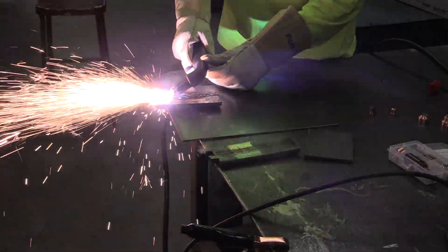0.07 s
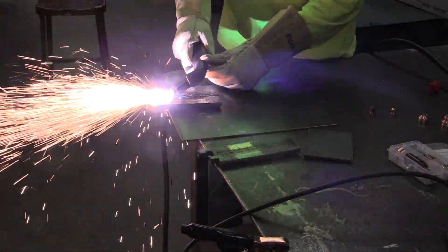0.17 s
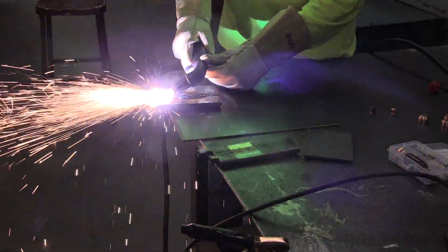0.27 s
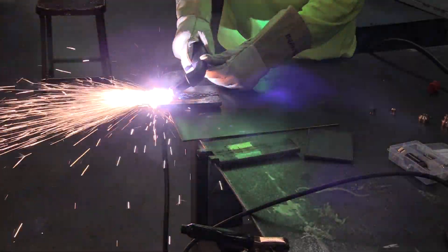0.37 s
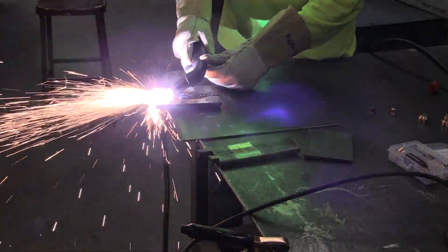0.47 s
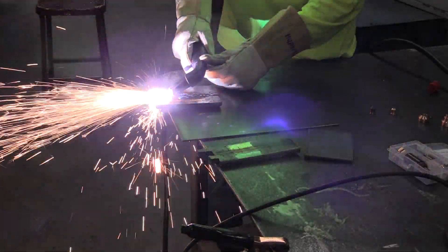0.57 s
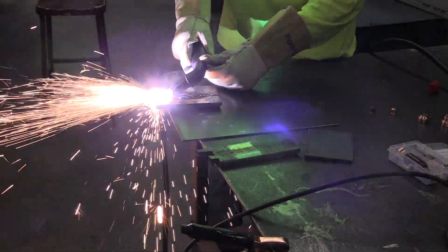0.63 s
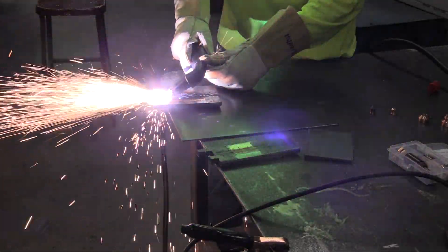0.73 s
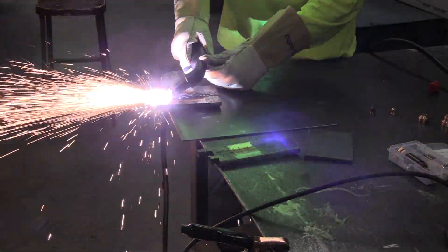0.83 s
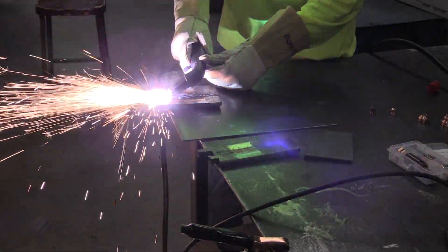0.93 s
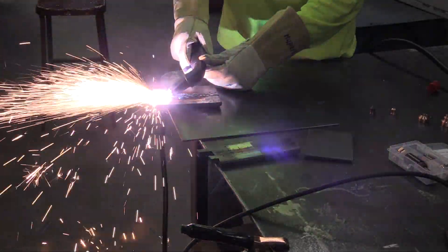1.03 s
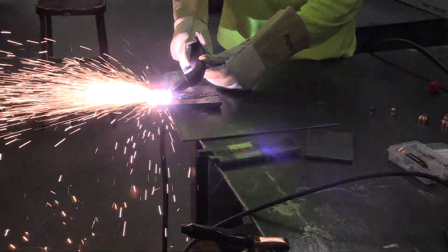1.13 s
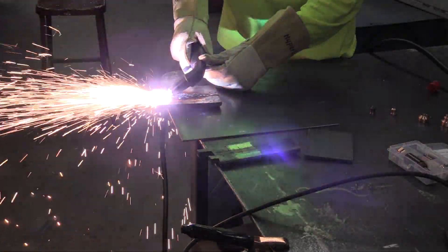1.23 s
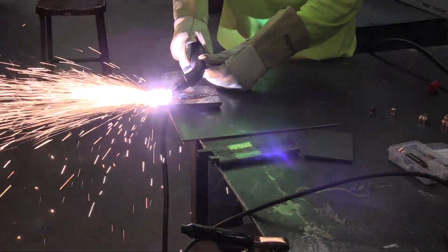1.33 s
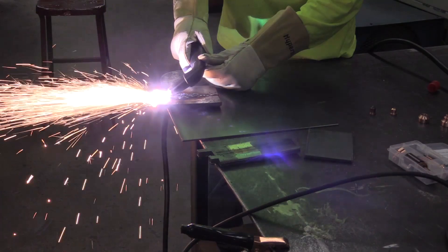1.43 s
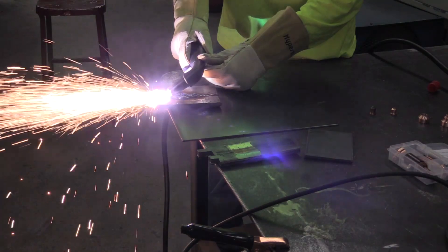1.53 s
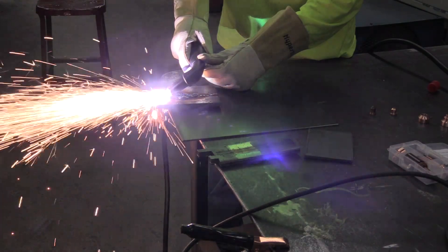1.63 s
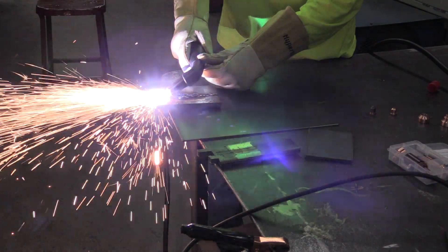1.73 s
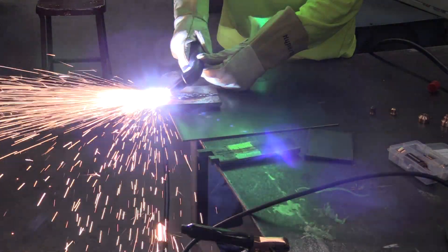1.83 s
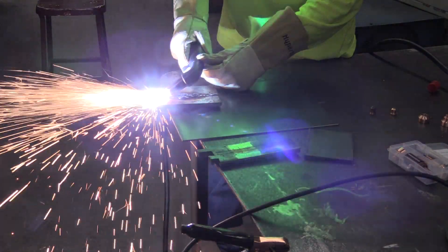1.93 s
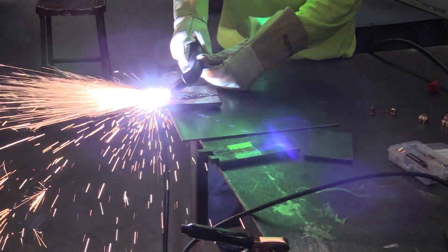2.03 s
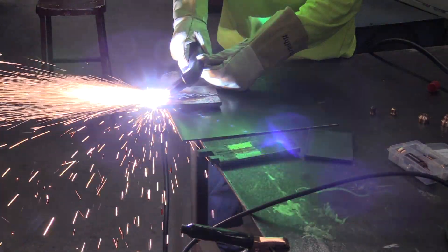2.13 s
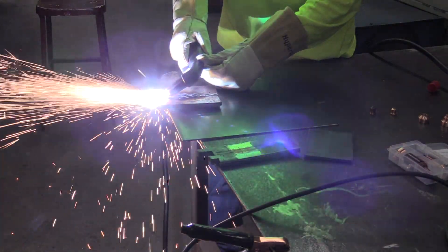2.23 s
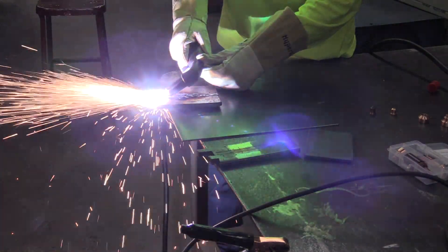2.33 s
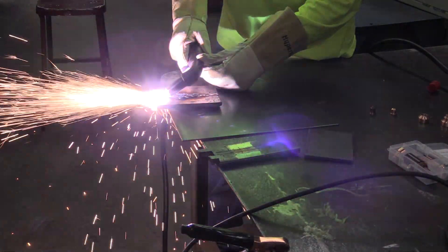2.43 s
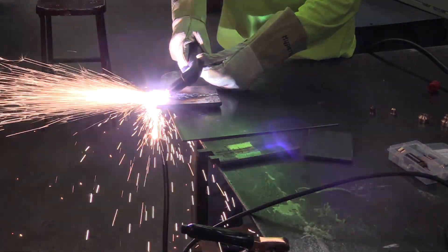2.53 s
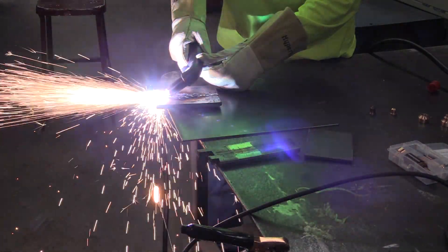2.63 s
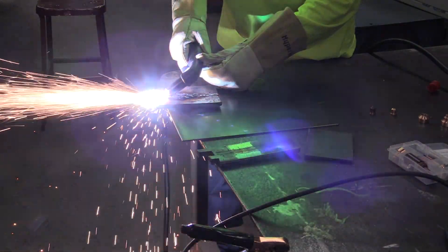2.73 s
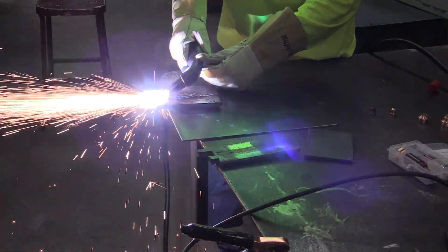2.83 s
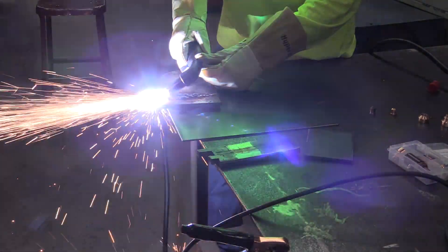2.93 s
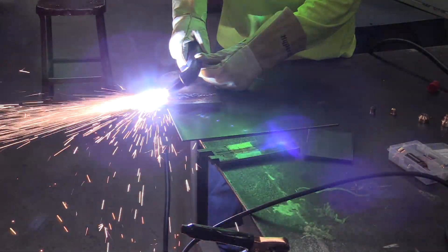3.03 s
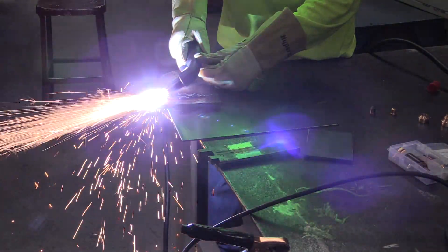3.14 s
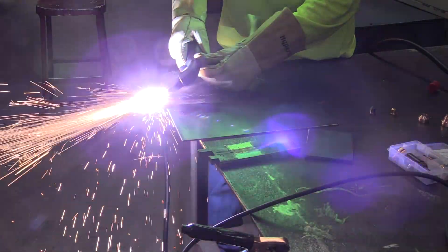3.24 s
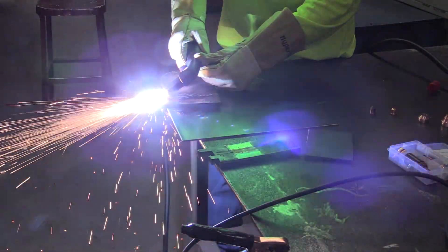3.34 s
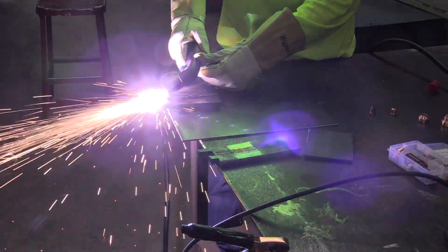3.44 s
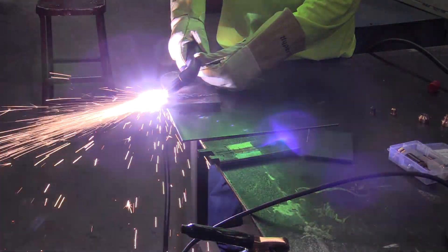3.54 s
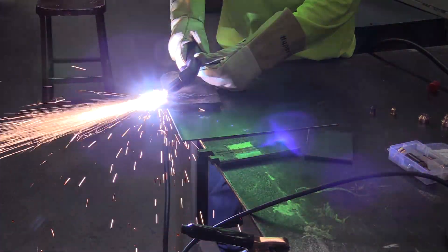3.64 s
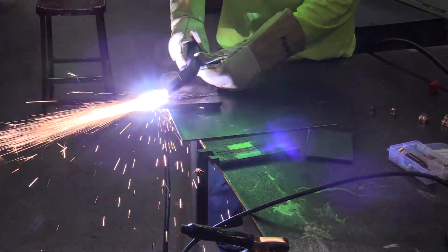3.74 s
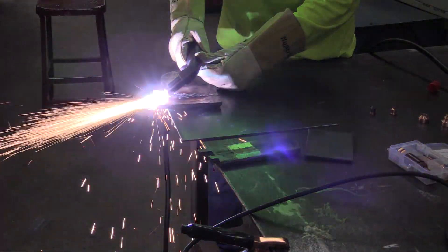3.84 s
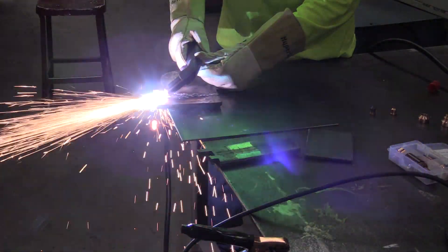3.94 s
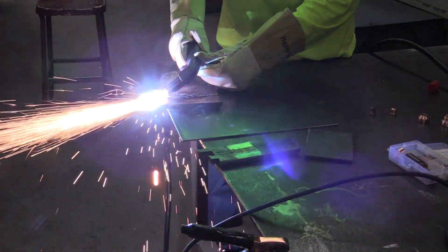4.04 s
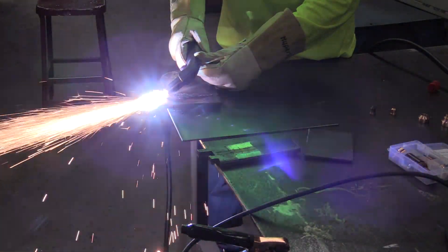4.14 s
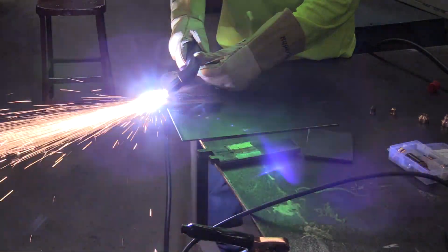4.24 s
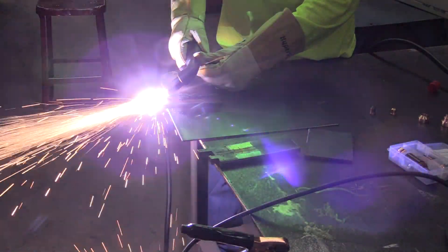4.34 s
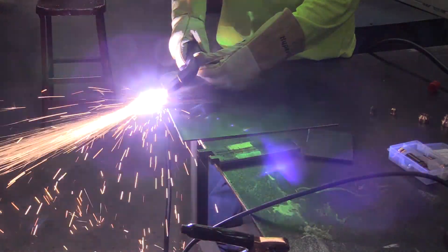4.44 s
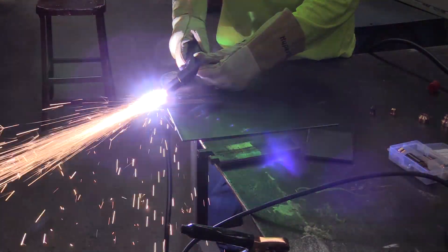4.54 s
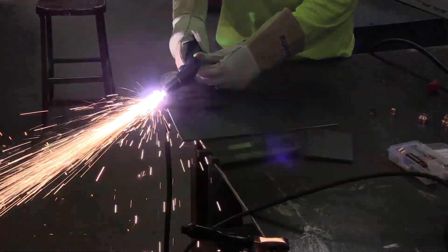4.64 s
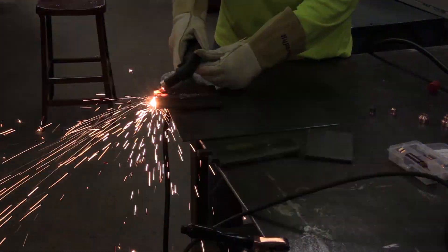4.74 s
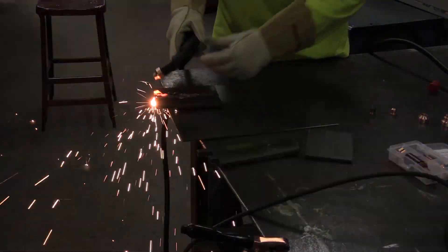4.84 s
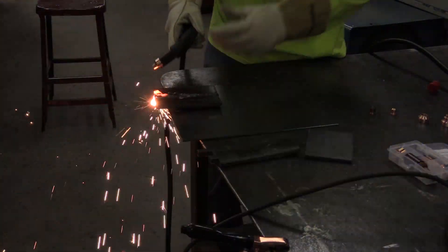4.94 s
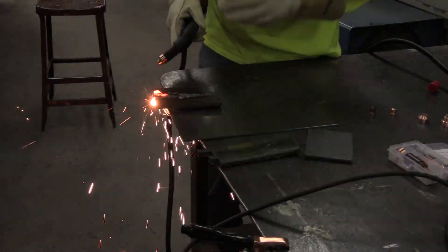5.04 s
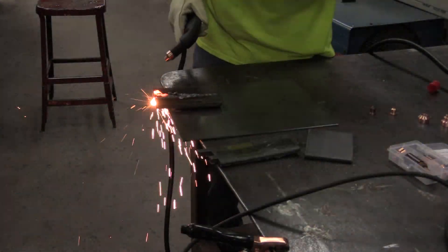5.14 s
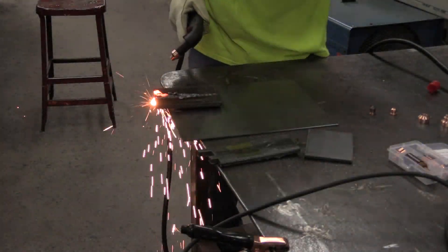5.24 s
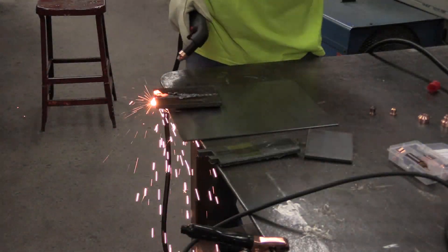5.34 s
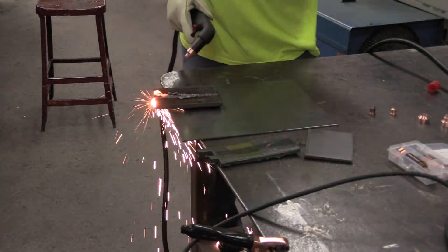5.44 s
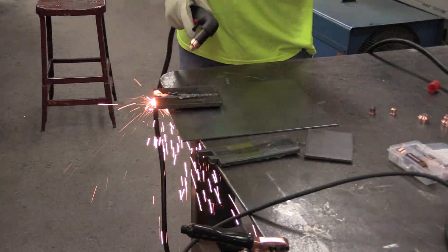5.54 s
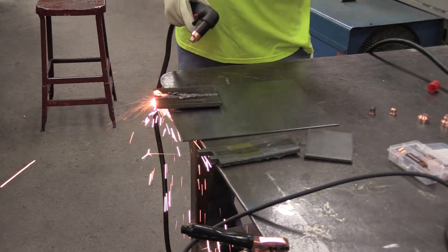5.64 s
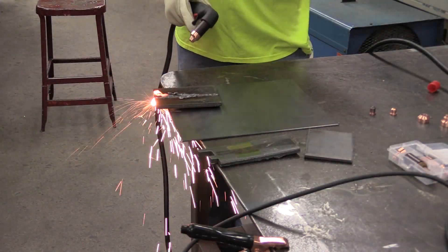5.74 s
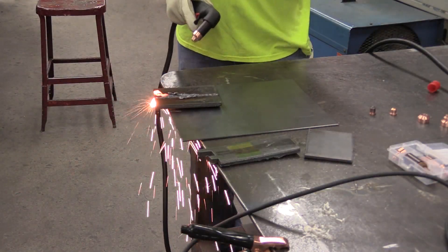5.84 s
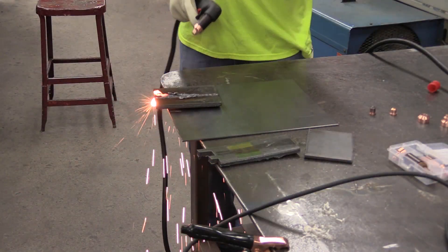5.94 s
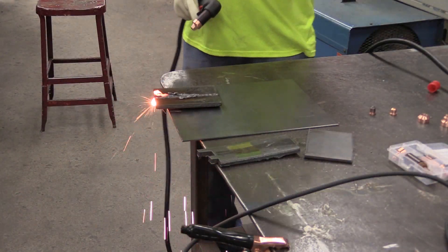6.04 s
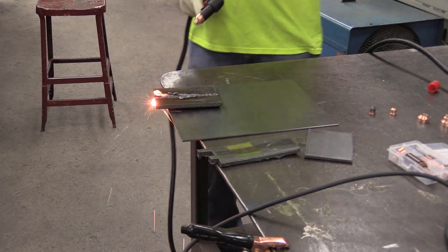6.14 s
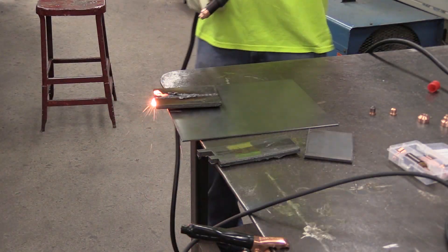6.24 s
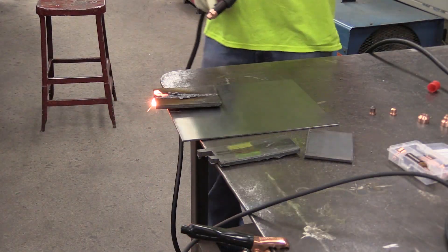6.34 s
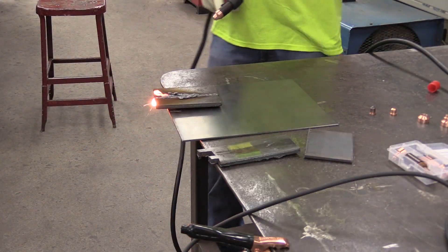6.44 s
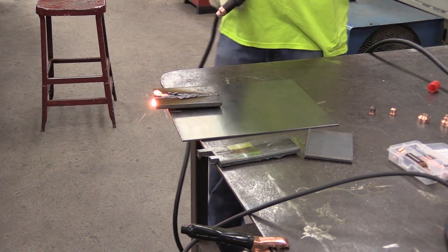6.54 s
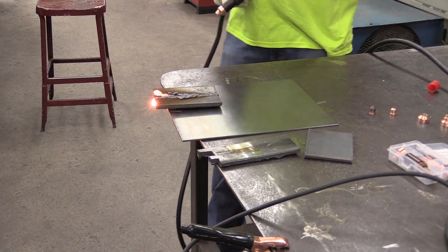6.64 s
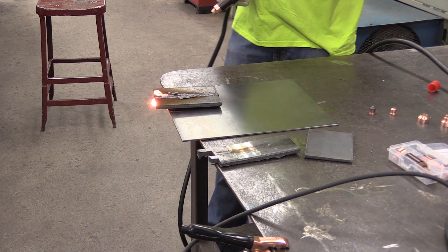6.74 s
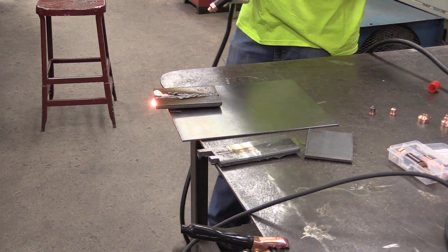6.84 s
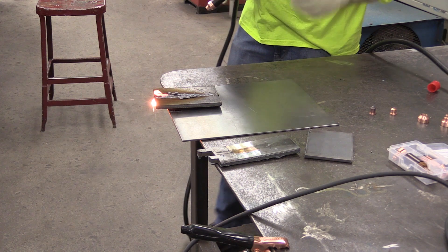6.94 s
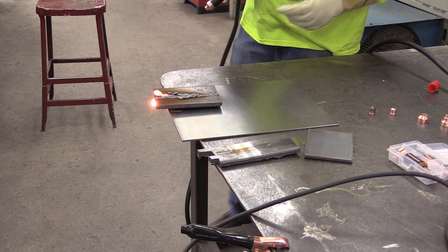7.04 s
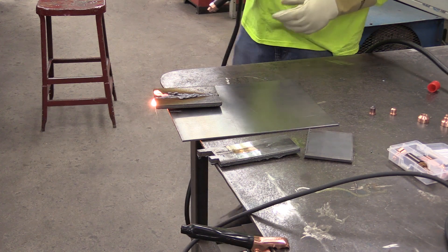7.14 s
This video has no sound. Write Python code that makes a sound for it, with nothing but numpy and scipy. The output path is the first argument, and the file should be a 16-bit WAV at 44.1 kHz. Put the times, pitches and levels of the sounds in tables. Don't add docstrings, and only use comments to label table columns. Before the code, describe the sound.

From 0 to about 4.75 s a plasma torch gouges steel with a loud, continuous roar: broadband jet noise strongest in the upper mids, little deep bass, fluttering slightly and surging gently by a decibel or two. Close echoes off metal, bench and floor give it a hollow, combed colour, with a thin high singing edge fading by 3 s. At 4.75 s it cuts off with a sharp dry pop and a short room tail. A far quieter, airy cooling hiss continues, dips near 5.2 s, then rises to a steady level by 5.7 s, its treble sweeping subtly as the nozzle turns. Low workshop rumble and hum emerge beneath, with a soft low bump near 5.6 s. At 5.95 s one dull, damped bench knock sounds with tiny bounces. A faint motor whine climbs slightly from about 6 s to the end at 7.2 s. Mono-like microphone, a few metres away.

```python
import sys
import numpy as np
from scipy import signal
from scipy.fft import rfft, irfft
from scipy.io import wavfile
from scipy.ndimage import uniform_filter1d, map_coordinates

SR = 44100
rng = np.random.default_rng(int(sys.argv[2]) if len(sys.argv) > 2 else 0)


def voltage_ratio(level):
    return 10 ** (np.asarray(level, float) / 20)


def waveform_to_disk(signal):
    frames = np.transpose(np.atleast_2d(signal))
    scaled = np.clip(frames, -1, 1) * 32767
    samples = np.round(scaled).astype(np.int16)
    wavfile.write(sys.argv[1], SR, samples)


N = 317079
T = np.arange(N) / SR
STEP = 32
SIZE = 45 * 2 ** 13
HZ = np.arange(SIZE // 2 + 1) * SR / SIZE + 1e-3
ARC_OFF_S = 4.7493

# f/Hz, level/dB per Hz
SHOP_COLOUR = [(15, -51), (25, -11), (69, -8.5), (144, -9.5), (189, -1.5), (438, -13), (524, -8.5),
               (805, -13.5), (896, -13), (1030, -12), (1240, -11), (1450, -11), (1800, -9.5), (2340, -16),
               (3960, -120)]
# f/Hz, width/Hz, level/dB
HUMS = [(78, 6.9, -61), (190, 60, -55)]
# t/s, whine f/Hz
MOTOR_SPEED = [
    (5.8, 1163),
    (6.05, 1175),
    (6.5, 1216),
    (6.7, 1233),
    (6.9, 1246),
    (7.19, 1257),
]
# ratio to the whine [1], level/dB, swell/dB, swell centre t/s, swell length/s
MOTOR_TONES = [(1, -57, 8, 6.55, .32), (.752, -63, 8, 6.3, .35), (.436, -61, 11, 5.95, .6)]
# f/Hz, level/dB, t60/s, build-up/ms
BENCH_MODES = [(570, 11, .018, 5), (420, -1, .022, 4), (950, -6, .016, 2), (1165, 2, .028, 6),
               (1500, 9, .022, 9), (1700, 2, .018, 1.5), (2100, 0, .016, 1.2)]
# delay/ms, level/dB
BOUNCES = [
    (0, 0),
    (9.5, -13),
    (20, -20),
]
# f/Hz, level/dB per Hz
AIR_COLOUR = [(760, -52), (1460, -31), (1850, -13.5), (2500, -5.5), (3220, 1), (3800, -3.5), (4150, -7.5),
              (5150, -7), (6700, -12), (8300, -11.5), (10300, -18.5), (12000, -19.5), (14200, -17),
              (15900, -20)]
# t/s, level/dB, brightness/dB as the nozzle swings
COOLING = [(4.8, -39.5, -2), (4.92, -39, -2.5), (5.08, -38.5, 1), (5.22, -41, 4.5), (5.45, -38.5, 2.5),
           (5.7, -34, 0), (6.2, -34, 0.5), (6.6, -33, 0), (7.19, -33, -.5)]
# t/s, glove echo delay/ms, edge band f/Hz, facing the microphone [0-1]
TORCH_TURN = [
    (4.9, .7, 14000, 0),
    (5.7, .7, 14000, .25),
    (6.12, .64, 14300, .62),
    (6.28, .7, 14000, .68),
    (6.5, .665, 15500, .95),
    (6.62, .65, 13800, .62),
    (6.8, .643, 14000, 1),
    (7.19, .645, 13900, .95),
]
GLOVE_SHARE = (.13, .26)
EDGE_DB = (-30, -11)
# delay/ms, level/dB
POP_PATHS = [
    (0, 1.5),
    (3.97, -3),
    (6.93, -9),
]
# f/Hz, level/dB per Hz
ARC_COLOUR = [(18, -70), (30, -39), (120, -24.5), (260, -18), (380, -19), (480, -12.5), (900, -11.5),
              (1400, -9.5), (1800, -5.5), (2600, -4), (3220, -2), (4400, -6), (8000, -11), (15900, -24)]
# t/s, level/dB, brightness/dB
JET = [(0, -22.5, 0.5), (.12, -21.5, 1), (.35, -22.5, 1), (.56, -23, -2), (.7, -22, -1), (1.0, -23, 1),
       (1.17, -24, 0.5), (1.4, -21.5, 1), (1.62, -24, 0), (1.85, -21, 0), (2.1, -22, -1), (2.5, -22, -.5),
       (3.2, -22, -0.5), (3.36, -23.5, -1), (3.48, -20.5, -1), (3.9, -22, -1), (4.3, -22.5, -1),
       (4.75, -22, 2.5)]
# delay/ms, returned band centre f/Hz, share early along the groove [1], share late [1]
ECHOES = [(0.452, 3000, -0.044, -0.047), (0.624, 20000, 0.23, 0.16), (0.82, 21000, -0.26, -0.0089),
          (0.996, 2600, 0.06, 0.072), (1.24, 14000, -0.25, -0.0036), (1.26, 5100, 0.068, 0.039),
          (1.396, 19000, 0.081, -0.002), (1.772, 1600, 0.14, 0.11), (1.78, 8400, -0.098, -0.035),
          (1.872, 12800, 0.08, 0.15), (2.696, 10000, -0.048, -0.067), (2.824, 14000, 0.034, 0.14),
          (2.836, 1100, -0.071, -0.16), (3.948, 6200, -0.041, -0.094), (3.968, 3000, -0.0066, 0.087),
          (3.988, 860, 0.32, 0.42), (4.016, 5900, 0.33, 0.15), (4.052, 2000, 0.047, -0.1),
          (6.9, 5900, 0.16, 0.19), (6.936, 620, 0.23, 0.26), (7.216, 3700, 0.085, 0.079),
          (9.044, 1300, -0.16, -0.12)]
# t/s, low edge f/kHz, high edge f/kHz
SPLITS = [(.65, 6.85, 8.35), (.857, 5.68, 6.93), (.859, 7.49, 9), (.974, 11.67, 13.82), (1.533, 8.23, 9.65),
          (2.798, 12.32, 14.56), (2.81, 5.17, 6.93), (2.81, 9.6, 11.8), (3.413, 8.23, 10.42),
          (3.689, 5.64, 7.6), (3.924, 5.14, 6.29), (3.924, 6.8, 8.35), (4.412, 5.12, 6.37),
          (4.553, 4.2, 5.25), (4.899, 5.64, 7.67), (5.175, 8.91, 10.42), (5.2, 4.13, 5.25),
          (5.291, 4.13, 5.21), (5.399, 4.22, 6.37), (5.501, 6.24, 7.67), (5.689, 5.12, 6.33),
          (5.689, 8.18, 9.69), (5.802, 4.18, 5.77), (5.805, 6.2, 7.58), (5.92, 6.3, 7.62),
          (6.034, 5.64, 6.89), (6.197, 7.54, 9.69), (6.269, 8.18, 9.69), (6.524, 4.65, 5.77),
          (6.966, 12.36, 14.56)]


def unit(x):
    return x / np.sqrt(np.mean(x ** 2))


def curves(table):
    s, *columns = np.transpose(table)
    return [np.interp(T, s, c) for c in columns]


def walk(rate):
    k = int(SR / rate / STEP) + 1
    held = np.repeat(rng.standard_normal(N // STEP // k + 1), k)
    slewed = uniform_filter1d(uniform_filter1d(held, k), k)
    return 1.3 * slewed[:len(T[::STEP])]


def smooth(control):
    return np.interp(T, T[::STEP], control)


def through(x, response):
    return irfft(rfft(x, SIZE) * response, SIZE)[:N]


def narrow(hz, width_hz):
    spread = signal.lfilter(*signal.butter(2, width_hz / 2, fs=SR), rng.standard_normal(N))
    return unit(spread * np.sin(2 * np.pi * np.cumsum(hz + 0 * T) / SR))


def turbulence(colour, ref_hz, tilt, flicker_db, flutter_db):
    hz, db = np.transpose(colour)
    spec = rfft(rng.standard_normal(SIZE))
    spec = spec * voltage_ratio(np.interp(np.log(HZ), np.log(hz), db, left=-80, right=-80))
    spec = spec / np.std(irfft(spec * (HZ > ref_hz[0]) * (HZ < ref_hz[1]), SIZE))
    spec = spec.astype(np.complex64)
    knots = np.log2([f for f, _ in tilt])
    lean = np.array([(curve - np.mean(curve))[::STEP] for _, curve in tilt])
    pitch = np.log2(HZ).astype(np.float32)
    out, shared = 0, walk(11)
    for octave in np.arange(np.floor(np.log2(hz[0])), np.log2(hz[-1]) + .5, .5):
        band = irfft(spec * np.clip(1 - 2 * abs(pitch - float(octave)), 0, 1), SIZE)[:N]
        weights = np.array([np.interp(octave, knots, row) for row in np.eye(len(knots))])
        shared = .8 * shared + .6 * walk(14)
        level_db = weights @ lean + flutter_db * shared + flicker_db * walk(30)
        out = out + band * smooth(voltage_ratio(level_db))
    return out


def room(x, wet_db, low_t60, high_t60, top_hz):
    t = T[:SR]
    noise = rng.standard_normal((2, SR)) * (t > .008)
    dull = signal.lfilter(*signal.butter(1, top_hz, fs=SR), noise[0]) * 1000. ** (-t / low_t60)
    bright = noise[1] * 1000. ** (-t / high_t60)
    tail = dull / np.linalg.norm(dull) + 0.021 * bright
    thin_walls = 1j * HZ / (350 + 1j * HZ)
    return x + voltage_ratio(wet_db) * through(x, rfft(tail, SIZE) * thin_walls)


def recovery():
    start_s, length_s, range_db = 5.1, 0.32, 2
    return range_db * (np.clip((T - start_s) / length_s, 0, 1) - 1)


def shop():
    tilt = [(250, -.6 * recovery()), (800, -.3 * recovery())]
    rumble = turbulence(SHOP_COLOUR, (60, 400), tilt, 1.5, 0.36)
    rumble = rumble * voltage_ratio(-48 + recovery()) * np.clip((T - 4.7) / 0.11, 0, 1)
    drone = sum(voltage_ratio(level_db) * narrow(hz, width) for hz, width, level_db in HUMS)
    drone = drone * np.clip((T - 5.) / 1.0, 0, 1)
    bump_s, bump_length_s = 5.57, .11
    bump = voltage_ratio(-43) * narrow(310, 420) * np.exp(-((T - bump_s) / bump_length_s) ** 2)
    return rumble + drone + bump


def motor():
    hz, = curves(MOTOR_SPEED)
    phase = 2 * np.pi * np.cumsum(hz * smooth(1 + .0006 * walk(12))) / SR
    tones = 0
    for ratio, db, swell_db, swell_s, length_s in MOTOR_TONES:
        swell = swell_db * np.exp(-((T - swell_s) / length_s) ** 2 / 2)
        waver_db = 1.2 * smooth(walk(10))
        tones = tones + voltage_ratio(db + swell + waver_db) * np.sin(ratio * phase)
    return tones * voltage_ratio(.8 + .5 * recovery()) * np.clip((T - 4.9) / .2, 0, 1)


def knock():
    knock_s, knock_db = 5.9522, -15
    out = 0
    for delay_ms, bounce_db in BOUNCES:
        t = np.clip(T - knock_s - delay_ms / 1000, 0, 1)
        for hz, db, t60, build_ms in BENCH_MODES:
            ring = np.sin(2 * np.pi * hz * t) * 1000. ** (-t / t60)
            build = 1 - np.exp(-(t * 1000 / build_ms) ** 2)
            out = out + voltage_ratio(knock_db + bounce_db) * voltage_ratio(db) * ring * build
    return out


def air():
    db, bright = curves(COOLING)
    top_rise_db, top_rise_s = 7, 0.76
    top = 1.1 * bright + top_rise_db * (1 - np.exp(-np.maximum(T - ARC_OFF_S, 0) / top_rise_s))
    hiss = turbulence(AIR_COLOUR, (2200, 4500), [(3200, 0 * db), (7000, bright), (13000, top)], 0.82, 0.27)
    ms, edge_hz, facing = curves(TORCH_TURN)
    treble = through(hiss, 1 / (1 + (6500 / HZ) ** 6))
    echo = map_coordinates(treble, [np.arange(N) - ms * SR / 1000], order=2)
    hiss = hiss + np.interp(facing, (0, 1), GLOVE_SHARE) * echo
    hiss = hiss + .08 * np.roll(hiss, 81)
    hiss = hiss + voltage_ratio(np.interp(facing, (0, 1), EDGE_DB)) * narrow(edge_hz, 700)
    return hiss * voltage_ratio(db) * np.clip((T - ARC_OFF_S + 0.023) / 0.031, 0, 1)


def pop():
    out = 0
    for ms, db in POP_PATHS:
        t = T - ARC_OFF_S - ms / 1000
        rise = np.clip(t / .001, 0, 50)
        suck = np.exp(-(t / .000095) ** 2)
        out = out + voltage_ratio(db - 5.5) * (.45 * rise * np.exp(-rise) - suck)
    return out


def surfaces(x):
    hz = HZ[::STEP]
    paths = []
    for ms, centre_hz, *_ in ECHOES:
        octaves = np.log2(hz / centre_hz)
        paths.append(np.exp(-(octaves / .8) ** 2 / 2 - 2j * np.pi * hz * ms / 1000))
    paths = np.array(paths)
    shares = np.transpose(ECHOES)[2:]
    early, late = (through(x, np.interp(HZ, hz, np.exp(share @ paths))) for share in shares)
    travel = np.clip((T - 1.2) / 1.8, 0, 1)
    return early + travel * (late - early)


def arc():
    db, bright = curves(JET)
    surge = db - np.mean(db)
    top = -0.47 * surge + .8 * bright - 0.03 * np.minimum(T, ARC_OFF_S)
    tilt = [(700, -0.37 * surge), (3000, 0 * db), (7000, -0.018 * surge + bright), (12500, top)]
    jet = turbulence(ARC_COLOUR, (1800, 4500), tilt, 0.52, 0.53)
    jet = jet + voltage_ratio(-25) * narrow(12750, 300) * np.clip((3.1 - T) / .6, 0, 1)
    burning = np.clip((ARC_OFF_S + 0.0027 - T) / 0.0048, 0, 1)
    return surfaces(jet * voltage_ratio(db - 0.27) * burning)


def scene():
    blow = knock()
    background = shop() + motor() + air()
    reverberant = room(arc() + pop() + .55 * blow, -14, .42, .25, 4000)
    mono = reverberant + .45 * blow + background
    return np.array([mono, mono])


def low_pass(x):
    return signal.sosfilt(signal.butter(12, 16290, fs=SR, output="sos"), x)


def record(dry):
    size = min(int(.048 * SR), 4096)
    side, noise = np.zeros(N), rng.standard_normal((len(SPLITS), 4096))
    for (s, low_khz, high_khz), row in zip(SPLITS, noise):
        edges = (1000 * low_khz + 80, 1000 * high_khz - 80)
        sos = signal.ellip(8, 1, 80, edges, "band", fs=SR, output="sos")
        start = int(s * SR) - size // 2
        loud = np.std(signal.sosfilt(sos, dry[0, start:start + size]))
        burst = unit(signal.sosfilt(sos, row))[-size:] * signal.windows.tukey(size, .8)
        side[start:start + size] += voltage_ratio(-1) * loud * burst
    top_hz, bass_hz = 15740, 70
    capsule = (HZ < top_hz) * 1j * HZ / (bass_hz + 1j * HZ)
    mix = np.array([through(ear, capsule) for ear in (dry[0] + side, dry[1] - side)])
    return low_pass(mix)


dry = scene()
out = record(dry)
waveform_to_disk(out)
```